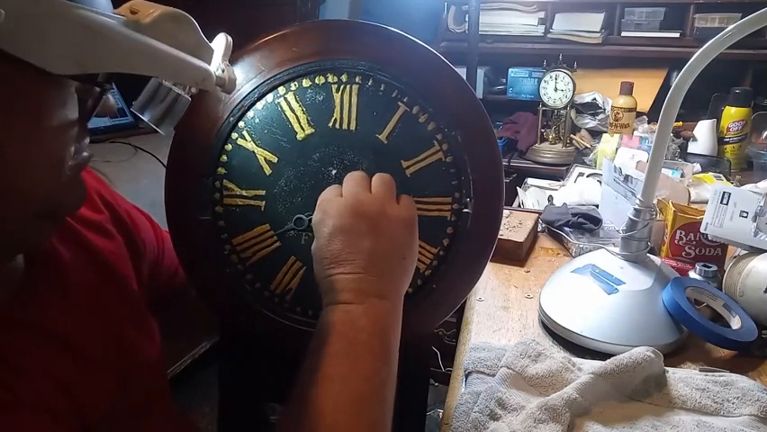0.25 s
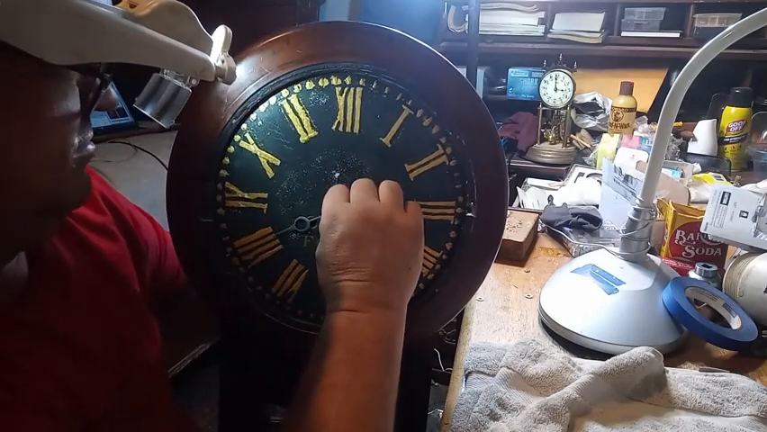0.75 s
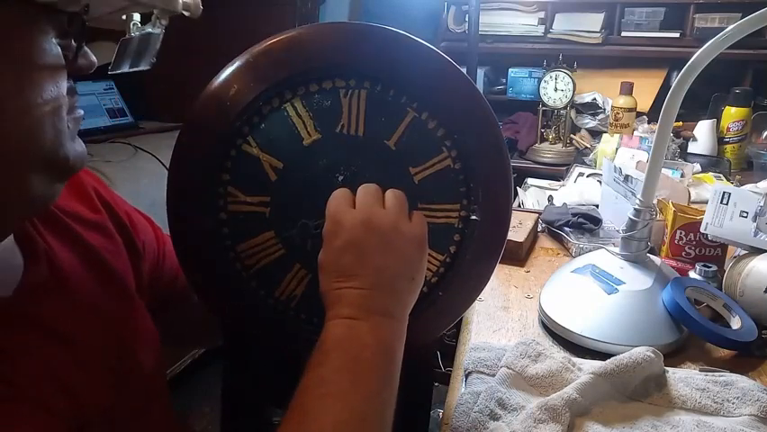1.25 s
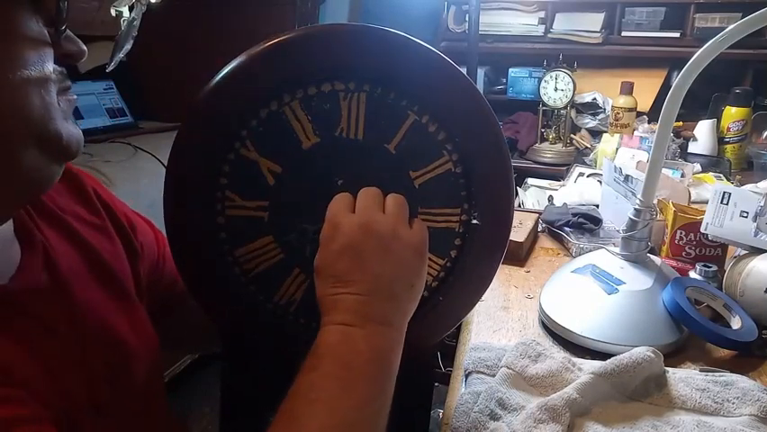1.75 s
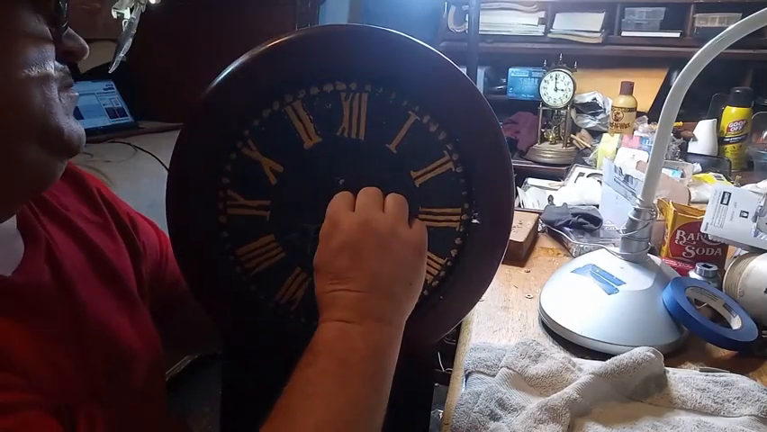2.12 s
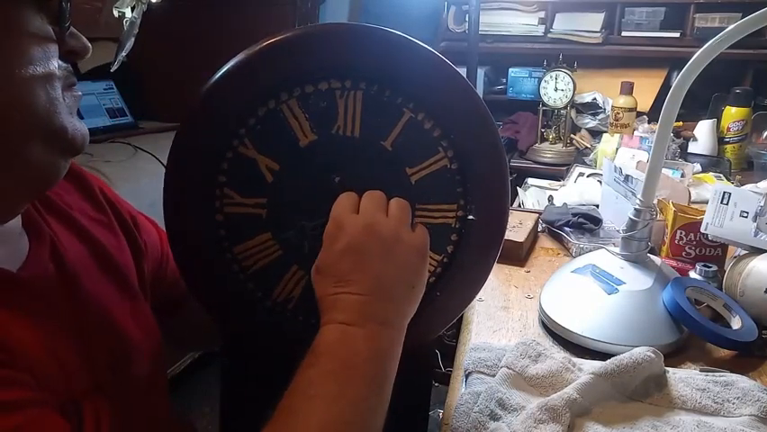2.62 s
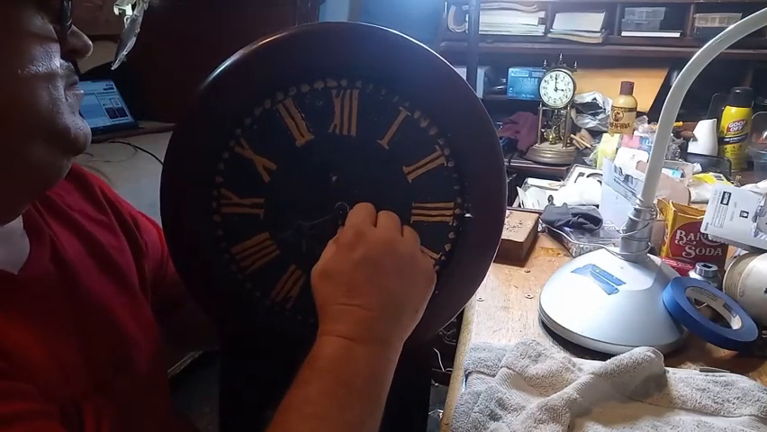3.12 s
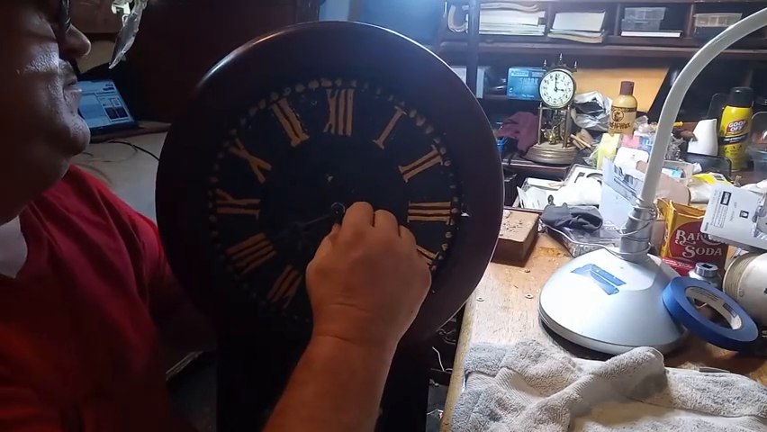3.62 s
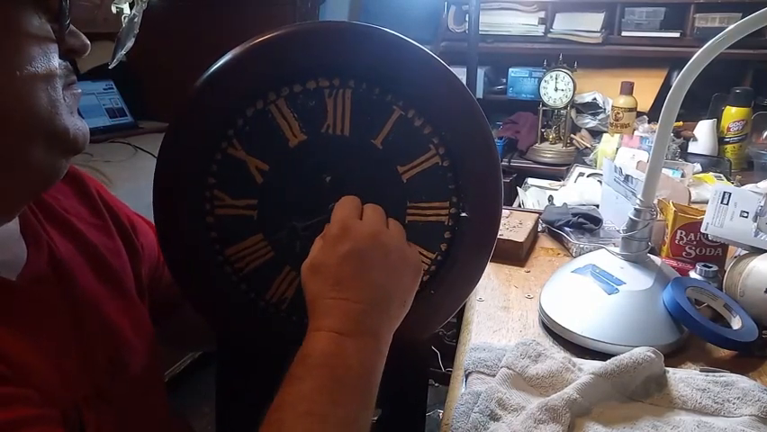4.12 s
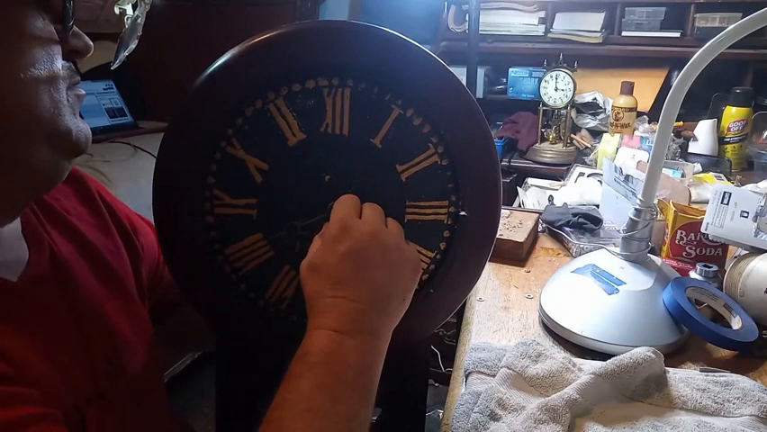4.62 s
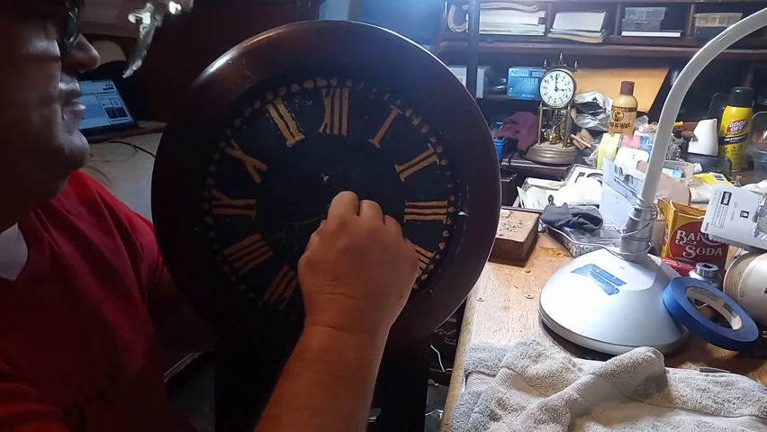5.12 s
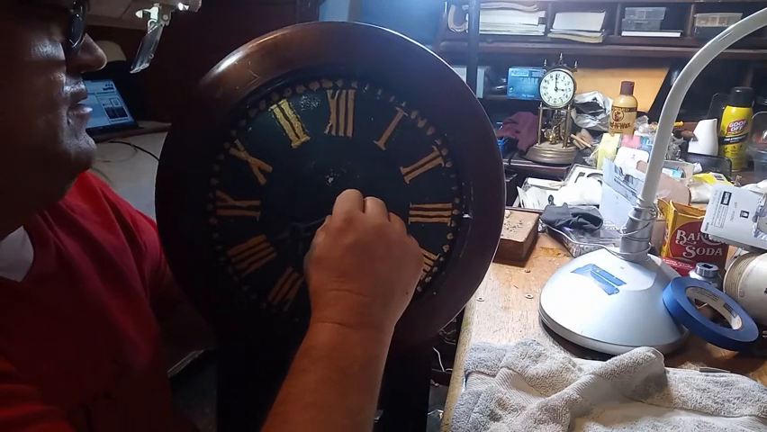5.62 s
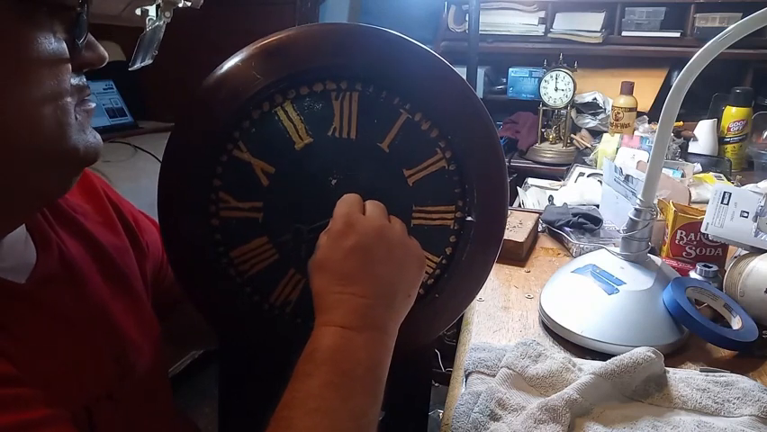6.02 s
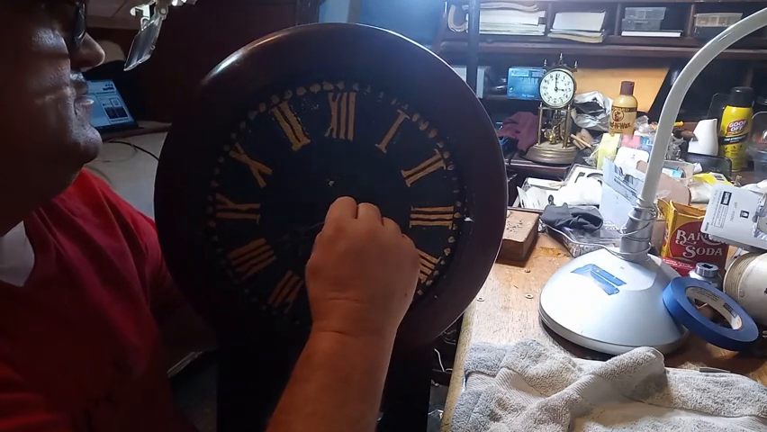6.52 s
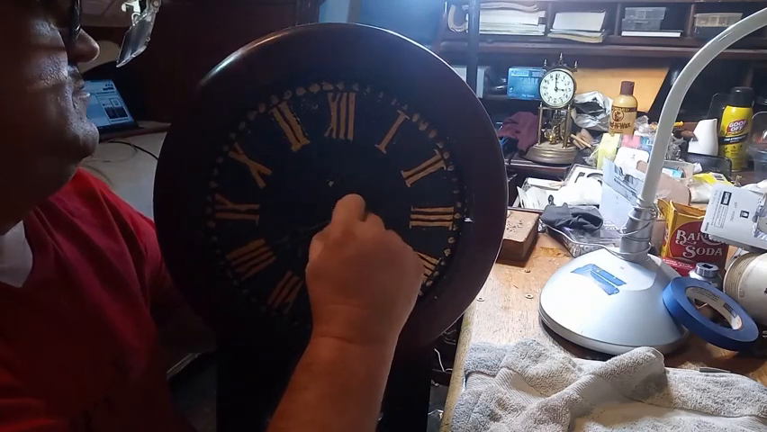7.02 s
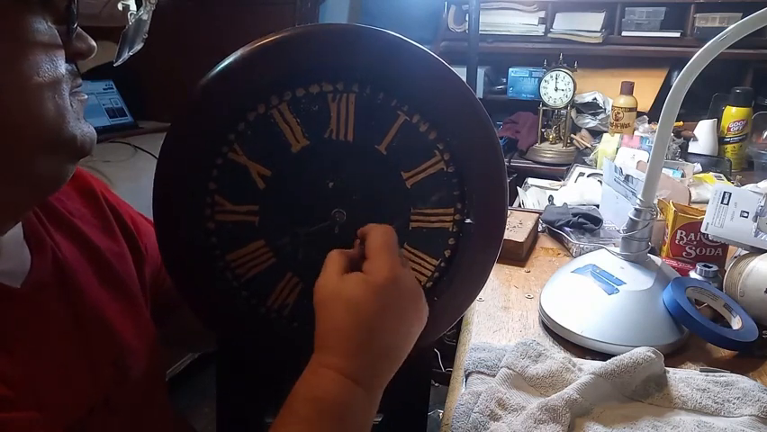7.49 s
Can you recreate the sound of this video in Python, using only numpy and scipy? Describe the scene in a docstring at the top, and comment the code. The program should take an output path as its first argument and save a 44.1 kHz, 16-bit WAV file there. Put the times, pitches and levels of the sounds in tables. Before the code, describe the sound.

A mechanical clock up close: minute hand scraping, a squeal and metallic drop, then whirring gears and eight knocking, ringing gong strokes.

```python
"""A wooden clock on a workshop bench strikes eight, heard from close by in a small room.
First the minute hand scrapes round in two pushes; a lever squeals up its pin and drops with a clatter.
Then the strike train spins up and whirrs as filtered noise, weakening as it slows to lift the hammer.
At each stroke the hammer trips with a tick and a rattle, knocks the case and sets a steel gong ringing.
Gong and case are decaying modes; now and then a dry wheel sings, and still air lies under it all."""
import sys
import numpy as np
from scipy import signal
from scipy.fft import rfft, irfft, next_fast_len
from scipy.io import wavfile
from scipy.ndimage import uniform_filter1d, map_coordinates

SR = 44100
rng = np.random.default_rng(int(sys.argv[2]) if len(sys.argv) > 2 else 0)


def dump_mix(stems):
    """Bounce the given channels to the path in sys.argv[1] as a 16-bit WAV at rate SR."""
    frames = np.atleast_2d(stems).T  # one column per channel
    limited = np.clip(frames, -1, 1)  # hard clip at full scale
    pcm = np.round(limited * 32767).astype(np.int16)
    wavfile.write(sys.argv[1], SR, pcm)


N = 341775
TIME = np.arange(N) / SR
AGE = np.arange(int(1.2 * SR)) / SR  # seconds since the start of a long ring
BRIEF = AGE[:SR // 2]  # the same for half a second

# Hammer strokes. Each row: landing in seconds, changes to gong modes 1 to 5 in dB (five columns),
# change to the twin modes in dB, ring time as a factor.
STROKES = [(1.977, -6.5, 0, 1.5, 5.5, 3, -3.5, 0.85), (2.779, -10, -8, 5, -3, 1, 7, 0.77),
           (3.587, -4, 3.5, 3.5, 2, -1.5, -5.5, 1.06), (4.394, -4, 1.5, 0, 0, -6, 0.5, 0.95),
           (5.220, 1.5, 1, 0.5, -0.5, -6, -2.5, 1.5), (6.031, 1, 1, 0, 4.5, 2, 3, 0.74),
           (6.853, 4.5, -5.5, -0.5, -5.5, -3.5, 10, 1.06), (7.678, -5, 1, 0, -7, 0, -0.5, 1)]
# Rough noise of rattling and rubbing metal. Each row: frequency in Hz, relative level in dB per Hz.
RATTLE_SPECTRUM = [(60, -36), (250, -13.5), (450, 6.5), (1100, 4.5), (2000, 0), (3000, -8.5), (3650, -2),
                   (4500, -14.5), (7000, -18), (10000, -30), (16000, -39)]


def amp(db):
    """Decibels to gain."""
    return 10 ** (np.asarray(db) / 20)


def unit(x):
    """Scale to rms 1."""
    return x / np.sqrt(np.mean(x ** 2) + 1e-20)


def along(points, hz):
    """Read (Hz, value) points on a log frequency axis."""
    f, v = np.transpose(points)
    return np.interp(np.log(hz + 1), np.log(f + 1), v)


def wobble(rate, size):
    """A smooth random curve with rate knots a second."""
    knots = rng.standard_normal(int(size * rate / SR) + 4)
    steps = np.arange(len(knots) * 8) / 8
    smooth = map_coordinates(knots, [steps], mode="nearest")
    return np.interp(np.arange(size) * (rate / SR), steps, smooth)


def filtered(x, response):
    """Weight the spectrum of x by a response of frequency."""
    m = next_fast_len(len(x) + 8192)
    return irfft(rfft(x, m) * response(np.fft.rfftfreq(m, 1 / SR)), m)[:len(x)]


def noise(spectrum, size):
    """Coloured noise of rms 1."""
    return unit(filtered(rng.standard_normal(size), lambda hz: amp(along(spectrum, hz))))


def patchy(x, depth_db):
    """Narrow bands of a noise swell and fade, each nearly on its own; rms 1."""
    bands = signal.stft(x, nperseg=2048)[2]
    field = uniform_filter1d(rng.standard_normal(bands.shape), size=3, axis=0)
    field = uniform_filter1d(field, size=7, axis=1)
    return unit(signal.istft(bands * amp(depth_db * unit(field)), nperseg=2048)[1][:len(x)])


def fade(t60, t):
    """Free decay, 60 dB in t60 seconds."""
    return np.exp(-np.log(1000) * t / t60)


def rise(seconds, t):
    """A soft start that nears 1 exponentially."""
    return 1 - np.exp(-t / seconds)


def swell(s, width):
    """A smooth hump of height 1 around s seconds."""
    return np.exp(-np.minimum(((TIME - s) / width) ** 2, 20))


def carried(in_phase, quadrature, turns):
    """A tone that has run through so many turns, with its two slowly moving parts."""
    angle = (2 * np.pi * (turns - np.floor(turns))).astype(np.float32)
    return in_phase * np.cos(angle) - quadrature * np.sin(angle)


def narrow(hz, width_hz, size=N):
    """A resonance kept ringing by random pushes, rms 1; its centre may move."""
    turns = np.cumsum(hz * np.ones(size)) / SR
    return unit(carried(wobble(width_hz, size), wobble(width_hz, size), turns))


def ringing(modes, t):
    """Free ring of (Hz, dB, t60 s) modes, each in a random phase."""
    return sum(amp(db) * fade(t60, t) * carried(0.98, 0, hz * t + rng.uniform()) for hz, db, t60 in modes)


def add(track, s, sound):
    """Mix a sound into the track at s seconds."""
    part = track[max(round(s * SR), 0):][:len(sound)]
    part += sound[:len(part)]


def reverberant(x):
    """The small room: each frequency of x dies away at its own rate."""
    # Each row: frequency in Hz, decay by 60 dB in seconds.
    room_decay = [(100, 0.24), (600, 0.41), (2500, 0.33), (7000, 0.24), (15000, 0.24)]
    hz, t, bands = signal.stft(x, SR, nperseg=256)
    decay = fade(along(room_decay, hz)[:, None], t)
    return signal.istft(bands * decay, SR, nperseg=256)[1][:len(x)]


def gong_mode(t, pair_hz, db, t60, twin_db, twin_t60, build, scatter=0.54, scatter_t60=0.88, drift_hz=4.8):
    """The steel bends in two planes at nearly one pitch, so it beats; it builds up softly and echoes flutter it."""
    tone, size = np.zeros(len(t)), len(t)
    echoes = scatter * fade(scatter_t60, t)
    drift = drift_hz * fade(2.7, t)
    onset = rise(build, t)
    for hz, level_db, life in zip(pair_hz, [db, twin_db], [t60, twin_t60]):
        turns = hz * t + np.cumsum(drift * wobble(13.2, size)) / SR + rng.uniform()
        ring = fade(life, t) * onset
        partial = ring * carried(1 + echoes * wobble(82.0, size), echoes * wobble(95, size), turns)
        # echoes only move the energy about in time
        tone += amp(level_db) * np.sqrt(np.mean(ring ** 2)) * unit(partial)
    return tone


def gong(gain_db=-1.5, choke_s=0.32):
    """Each stroke shares its energy anew among six modes; the settling hammer chokes all but the second."""
    # Bending modes of the gong. Each row: pitch in Hz, pitch of its twin in the other plane in Hz.
    mode_pairs = [(2128, 2134), (3860.5, 3888), (6000, 5990), (8429, 8451), (11203, 11232), (14322, 14295)]
    # Their ring before each stroke's changes. Each row: relative level in dB, decay by 60 dB in seconds,
    # the twin's relative level in dB, the twin's decay in seconds, build-up in seconds.
    mode_rings = [(-40, 0.37, -53, 0.21, 0.033), (-40.5, 1.13, -30, 0.18, 0.033),
                  (-30, 0.44, -42, 0.51, 0.094), (-41.5, 0.71, -45.5, 0.6, 0.038),
                  (-37, 0.45, -44, 0.41, 0.06), (-48.5, 0.31, -52, 0.33, .02)]
    out = np.zeros(N)
    choked = np.exp(-(BRIEF / choke_s) ** 3)
    for s, *shares_db, twin_extra_db, ring_time in STROKES:
        shares_db = shares_db + [0]  # the sixth mode has no level change of its own
        for k, (pair_hz, ring, share_db) in enumerate(zip(mode_pairs, mode_rings, shares_db)):
            db, t60, twin_db, twin_t60, build = ring
            t, stretch, damper = (AGE, 1, 1) if k == 1 else (BRIEF, ring_time, choked)
            tone = gong_mode(t, pair_hz, db, t60 * stretch, twin_db + twin_extra_db, twin_t60 * stretch, build)
            add(out, s, amp(gain_db + share_db) * damper * tone)
    return out


def knocks(wood_db=-1.55, crack_db=-38.5, room_db=-34.5, board_db=-27, patchy_db=3, rattle_db=0.7):
    """The blow passes through the gong's mount into the case, which booms, rattles and fills the room."""
    # Ring of the wooden case. Each row: frequency in Hz, relative level in dB, decay by 60 dB in seconds.
    case_modes = [(244.3, -50.5, 0.21), (284, -50.5, 0.27), (392.5, -42, 0.33), (406, -43, 0.3),
                  (432, -53.5, 0.41), (492, -46, 0.37), (558, -48, 0.35), (620, -40, 0.24),
                  (669, -39, 0.36), (695.5, -39, 0.18), (731, -50.5, 0.2), (821, -47.5, 0.53),
                  (850, -46, .25), (943.5, -45, 0.31), (1010, -46, 0.39), (1052, -46, 0.42),
                  (1107, -54, 0.44), (1173, -50, 0.3), (1366, -43.5, 0.17), (1548, -50.5, 0.36),
                  (1710, -51, 0.25), (1890, -53, .18)]
    # Noise of the blow. Each row: frequency in Hz, relative level in dB per Hz.
    knock_spectrum = [(25, -51), (60, -38), (130, -22.5), (250, -7.5), (330, -18.5), (450, -11), (680, 2),
                      (1000, -7.5), (2000, -9.5), (3200, -11), (4700, -16.5), (7000, -13.5), (10500, -23.5),
                      (13500, -26.5), (15300, -16)]
    out, t = np.zeros(N), BRIEF
    for s, *_ in STROKES:
        wood = ringing(case_modes, t) * rise(0.0029, t)
        crack = noise(knock_spectrum, len(t)) * fade(0.11, t) * rise(0.00072, t)
        rattle = amp(rattle_db * wobble(171.5, len(t)))
        room = reverberant(patchy(noise(knock_spectrum, len(t)), patchy_db)) * rise(0.0052, t) * rattle
        add(out, s, amp(wood_db) * wood + amp(crack_db) * crack + amp(room_db) * room)
        # the back board adds a short, heavily damped 600 Hz thump a moment later
        board = np.sin(2 * np.pi * 600 * t) * fade(0.045, t) * rise(0.002, t)
        add(out, s + 0.0051, amp(board_db) * board)
    return out


def trips(patchy_db=4, grain_db=-1.0, rise_s=0.0029, landed_t60=0.34):
    """The hammer tail slips off its pin with a tick and a rattle that dies away once the head lands."""
    # The tail leaving its pin. Each row: start in seconds, rattle level in dB, tick level in dB.
    releases = [(1.934, -51.5, -49), (2.734, -49, -48.5), (3.54, -51.5, -56), (4.349, -52.5, -53),
                (5.175, -55, -50), (5.996, -54, -72), (6.826, -52, -65), (7.656, -53.5, -65)]
    out, t = np.zeros(N), BRIEF
    tick = np.sin(2 * np.pi * 3640 * t) * fade(0.041, t) * rise(0.00035, t)
    for (s, rattle_db, tick_db), (lands, *_) in zip(releases, STROKES):
        rattle = patchy(noise(RATTLE_SPECTRUM, len(t)), patchy_db) * amp(grain_db * wobble(156, len(t)))
        shape = rise(rise_s, t) * fade(landed_t60, np.maximum(s + t - lands, 0))
        add(out, s, amp(rattle_db) * rattle * shape + amp(tick_db) * tick)
    return out


def train_speed(start_s=1.14, spin_up_s=0.27, lead_s=0.22, width_s=0.29, sag=0.26):
    """Share of full speed: the train spins up, and sags under each hammer lift after the first stroke."""
    # the load is heaviest lead_s before a stroke
    load = sum(swell(s - lead_s, width_s) for s, *_ in STROKES[1:])
    return rise(spin_up_s, np.maximum(TIME - start_s, 0)) * np.clip(1 - sag * load, 0, 1)


def train(teeth_db=-8, swell_db=3.0, waver=.022, uneven_db=1.45, patchy_db=3.5):
    """Meshing teeth keep the wavering plates ringing and the fly's pivots hiss; speed sets their loudness."""
    # Resonances of plates and wheels. Each row: centre in Hz, width in Hz, relative level in dB.
    plate_modes = [(477, 70, -7), (600, 110, -10.5), (815, 68, -2), (901, 54, -1.5), (1039, 130, -0.5),
                   (1127, 70, 0), (1310, 240, -4), (1545, 80, -2.5), (1750, 240, -0.5), (2345, 130, 0),
                   (2566, 250, -4.5), (3180, 410, -17)]
    # Hiss of the pivots. Each row: frequency in Hz, relative level in dB per Hz.
    pivot_spectrum = [(3000, -2.5), (4500, -21), (5200, -1), (5800, 4), (6250, -5), (6750, 5.5),
                      (7500, -21), (9500, -16), (11000, -9), (12000, -22), (16000, -22)]
    whirr_db, whirr_power, hiss_db, hiss_power = -64.5, 1, -68.5, 0.91  # amplitude goes as speed ** power
    chatter_db, settle_s, settle_width_s = 8.5, 3.94, 0.17  # the wheels run louder at first, then settle
    speed = train_speed()
    extra_db = chatter_db * (1 - np.tanh((TIME - settle_s) / settle_width_s)) / 2
    plates = np.zeros(N)
    for hz, width_hz, db in plate_modes:
        level = amp(db + swell_db * wobble(7, N))
        plates += level * narrow(hz * (1 + waver * wobble(5, N)), width_hz)
    teeth = amp(teeth_db) * patchy(noise(RATTLE_SPECTRUM, N), patchy_db)
    body = unit(patchy(plates, depth_db=3.5) + teeth)
    whirr = amp(whirr_db + extra_db) * speed ** whirr_power * body
    hiss = amp(hiss_db) * speed ** hiss_power * patchy(noise(pivot_spectrum, N), patchy_db)
    return (whirr + hiss) * amp(uneven_db * wobble(17, N))


def metal_contacts(grain_db=2, ring_db=3.5, clatter_db=2, patchy_db=3.0):
    """Metal parts hit, ringing and clattering inside the case, which rocks once with a dull thud."""
    # Metal contacts: levers dropping, and one bounce of the hammer at 6.955 s.
    # Each row: start in seconds, relative level in dB, clatter's decay by 60 dB in seconds.
    contacts = [(0.8453, -43, 0.37), (0.876, -46, 0.11), (.893, -46.5, 0.18), (0.919, -51, 0.26),
                (1.062, -63.5, 0.71), (1.094, -64, 0.37), (1.15, -69, .5), (4.739, -62, .15),
                (6.955, -53, 0.19), (7.202, -66, 0.12)]
    # Ring of the steel. Each row: frequency in Hz, relative level in dB, decay by 60 dB in seconds.
    steel_modes = [(402, -17, 0.31), (1232, -10.5, 0.32), (1360, -11.5, 0.37), (1770, -8.5, 0.15),
                   (2050, -23, 0.28), (2660, -7.5, 0.14), (3200, -23, 0.15), (3700, -13, 0.24),
                   (6250, -19, 0.23)]
    # Clatter noise. Each row: frequency in Hz, relative level in dB per Hz.
    clatter_spectrum = [(59, -52), (100, -21), (206, -36), (398, -16.5), (535, -19), (608, -6), (676, -25),
                        (818, -11.5), (1330, -9), (2370, -13), (2690, -11.5), (4870, -23), (6150, -25.5),
                        (12100, -45), (16000, -41)]
    out, t = np.zeros(N), BRIEF
    for s, db, t60 in contacts:
        grain = amp(grain_db * wobble(497, len(t)))
        clatter = unit(patchy(noise(clatter_spectrum, len(t)), patchy_db) * grain) * fade(t60, t)
        contact = amp(clatter_db) * clatter + amp(ring_db) * ringing(steel_modes, t)
        add(out, s, amp(db) * contact * rise(0.0014, t))
    thud = swell(0.98, width=0.064) * narrow(149.8, width_hz=55)
    return out + amp(-70) * thud


def lifting_lever(squeal_db=-67, rub_db=8.5, patchy_db=3, drop_s=0.86, swell_db_per_s=85, fade_db_per_s=39):
    """The lever rubs and squeals ever louder as its pin lifts it, and quietens after it has dropped."""
    before, after = np.maximum(drop_s - TIME, 0), np.maximum(TIME - drop_s, 0)
    db = squeal_db - swell_db_per_s * before - fade_db_per_s * after
    rub = patchy(noise(RATTLE_SPECTRUM, N), patchy_db)
    return amp(db) * (narrow(3850, width_hz=260) + amp(rub_db) * rub)


def minute_hand(squeak_db=-6, rub_db=-1.0, grain_db=-1.0, patchy_db=4.5):
    """Dry friction with a broad squeak that sinks as each push slows."""
    # Pushes on the hand. Each row: start in seconds, relative level in dB, hold in seconds.
    pushes = [(0.073, -55, 0.11), (0.362, -56.5, 0.013)]
    # Rubbing noise. Each row: frequency in Hz, relative level in dB per Hz.
    scrape_spectrum = [(180, -57), (300, -33), (574, -7), (680, -8), (870, -0.5), (1030, -14), (1200, -2),
                       (2370, 0.5), (3130, -4.5), (3550, -16), (6470, -19.5), (8290, -44), (12000, -38),
                       (15600, -74), (22000, -120)]
    attack_s, push_t60 = .016, 0.27
    start_hz, end_hz, sag_s = 3050, 2045, .04  # the squeak stops sinking sag_s after the hold
    out, t = np.zeros(N), BRIEF
    for s, db, hold in pushes:
        grain = amp(grain_db * wobble(400, len(t)))
        rub = patchy(noise(scrape_spectrum, len(t)) * grain, patchy_db)
        force = rise(attack_s, t) * fade(push_t60, np.maximum(t - hold, 0))
        centre_hz = np.interp(t, [0, hold + sag_s], [start_hz, end_hz])
        squeak = narrow(centre_hz, width_hz=350, size=len(t))
        add(out, s, amp(db) * force * (amp(squeak_db) * squeak + amp(rub_db) * rub))
    return out


def singing_wheel():
    """Now and then a dry wheel sings on one note, a narrow resonance that swells and fades."""
    # Each row: loudest moment in seconds, half-length in seconds, pitch in Hz, level in dB.
    songs = [(4.274, 0.028, 1557, -62), (4.756, 0.18, 915, -64.5), (6.263, 0.12, 828, -72),
             (7.21, 0.026, 890, -64.5)]
    return sum(amp(db) * swell(s, width) * narrow(hz, width_hz=20) for s, width, hz, db in songs)


def still_air(air_db=-73):
    """The quiet of the workshop: steady coloured noise whose bands drift a little."""
    # Each row: frequency in Hz, relative level in dB per Hz.
    air_spectrum = [(20, -60), (40, -40), (62, -7.5), (130, -7), (280, -8), (450, -10.5), (1200, -11.5),
                    (1900, -16), (3500, -24.5), (4700, -32), (7000, -28.5), (10000, -31), (16000, -38)]
    return amp(air_db) * patchy(noise(air_spectrum, N), depth_db=2.0)


def scene():
    """The clock close to the microphone, over the still air of the workshop."""
    strokes = gong() + knocks() + trips()
    movement = train() + metal_contacts() + lifting_lever() + minute_hand() + singing_wheel()
    return (strokes + movement + still_air())[None]


def record(dry):
    """The microphone chain passes nothing from its band limit of 16 kHz upwards."""
    return np.array([filtered(x, lambda hz: hz < 16000) for x in dry])


dry = scene()
out = record(dry)
dump_mix(out)
```